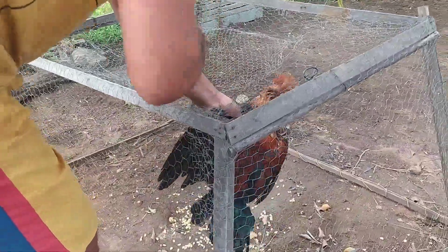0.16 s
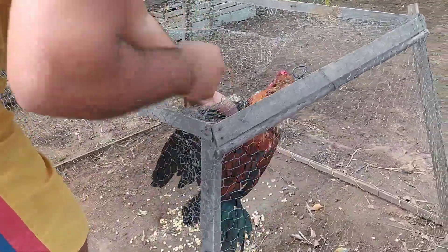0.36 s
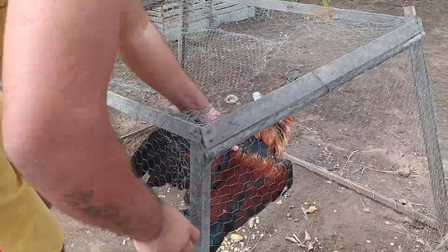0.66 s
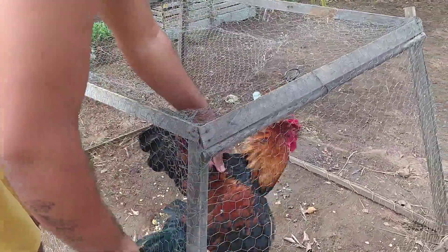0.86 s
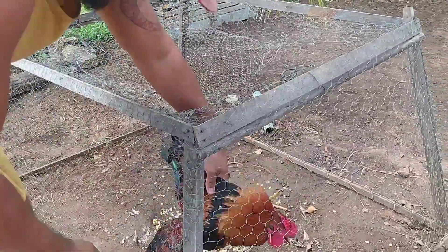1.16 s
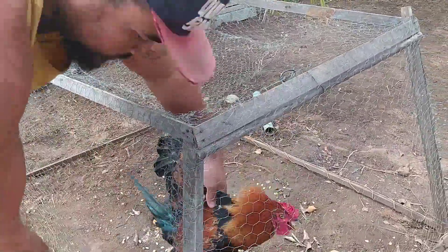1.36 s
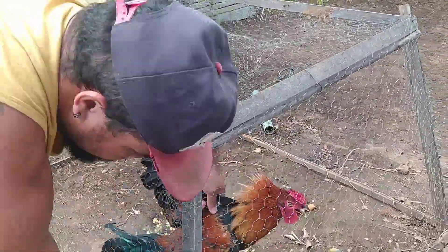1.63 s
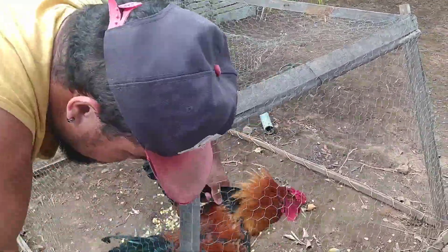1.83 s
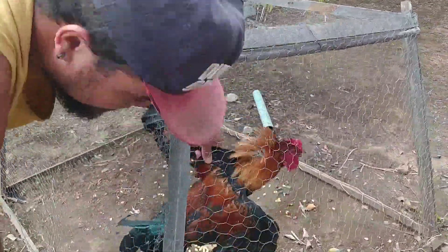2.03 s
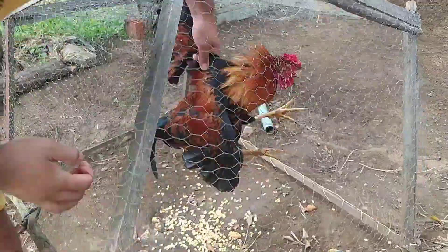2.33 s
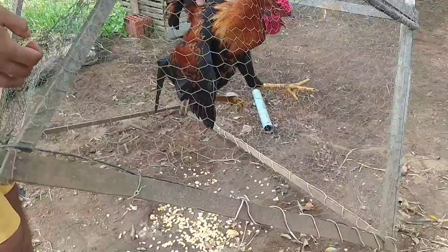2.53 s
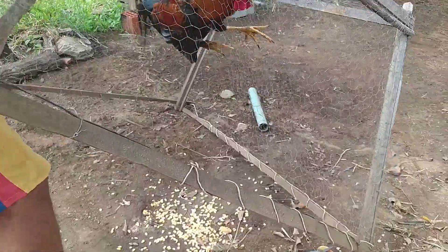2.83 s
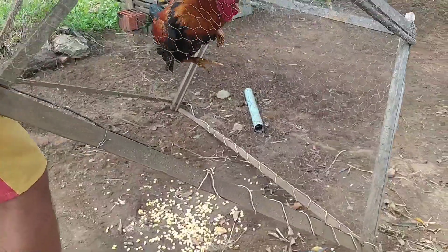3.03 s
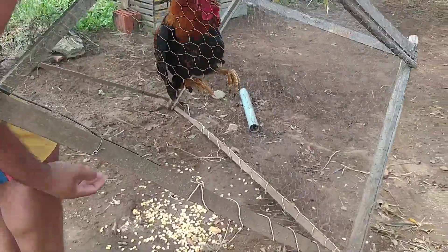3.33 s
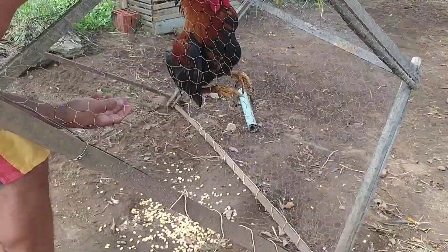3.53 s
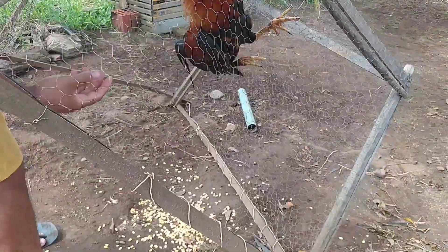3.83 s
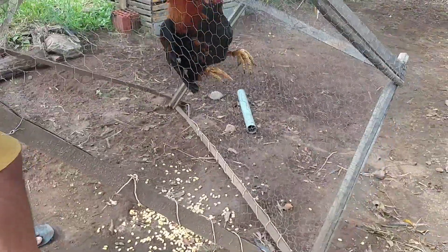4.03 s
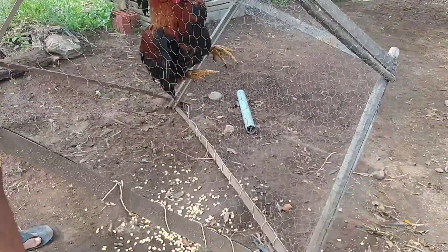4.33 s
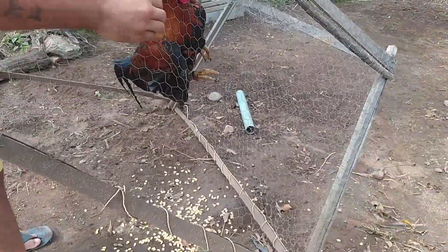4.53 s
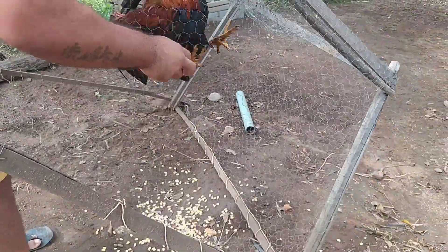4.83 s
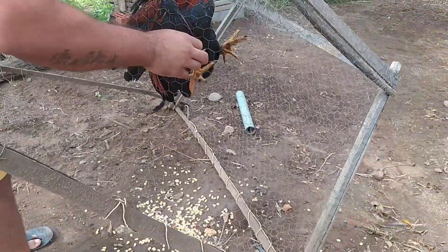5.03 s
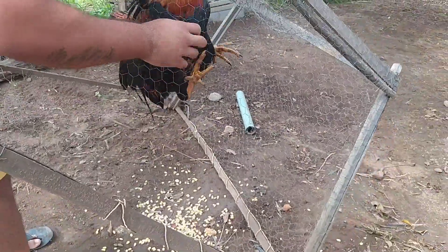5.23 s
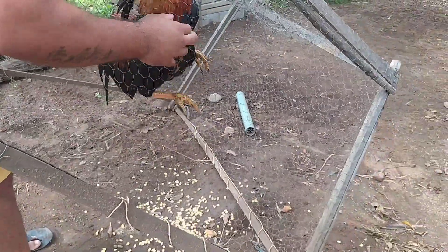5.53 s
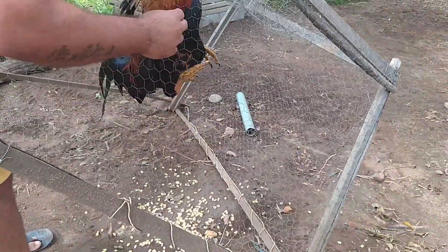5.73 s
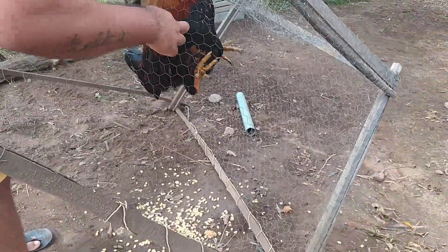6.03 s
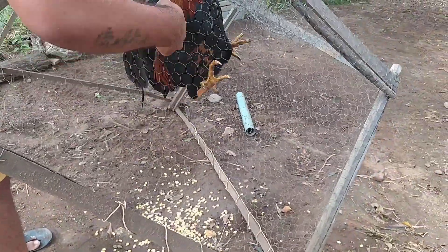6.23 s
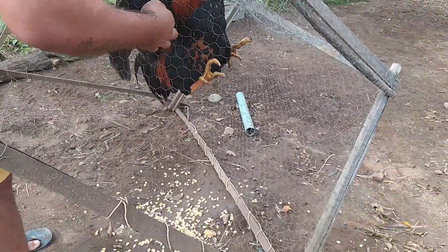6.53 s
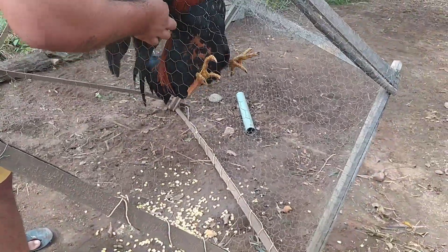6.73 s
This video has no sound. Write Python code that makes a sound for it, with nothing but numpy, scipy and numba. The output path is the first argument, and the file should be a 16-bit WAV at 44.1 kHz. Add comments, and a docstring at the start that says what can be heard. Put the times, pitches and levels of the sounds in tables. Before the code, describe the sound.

Close, hoarse squawks from a rooster being held, six in a row, each rasping cry separated by a brief quiet farmyard gap.

```python
"""A rooster squawks six times, close to a two-port microphone in a farmyard.
The first squawk is already in full harmonic cry; each later one starts as a chaotic rasp of the
membranes ringing throat and beak, then locks into the cry. All but the last collapse in a short croak.
Behind it: another fowl far off, a small bird, a few ticks, yard hiss and wind on the ports."""
import sys
import numpy as np
from scipy import signal
from scipy.fft import rfft, irfft
from scipy.io import wavfile
from scipy.ndimage import uniform_filter1d, map_coordinates
from numba import njit

SR = 44100
rng = np.random.default_rng(int(sys.argv[2]) if len(sys.argv) > 2 else 0)


def master(y):
    """Save y as 16-bit WAV."""
    cut = np.clip(np.atleast_2d(y).T, -1, 1)
    pcm = np.round(cut * 32767)  # scale
    wavfile.write(sys.argv[1], SR, pcm.astype(np.int16))


N = 303849

# per cry: time_s, first_partial_db, second_partial_db, beak_db, opening_ratio, odd_db, treble_db
CRY_LEVELS = [
    [(0.0, -27, -23.5, -16.5, 0.15, 2, -36.5), (0.112, -23.5, -15.5, -11, 0.45, 0, -37),
     (0.144, -24, -14, -8.5, 0.47, -2.5, -35), (0.2, -24, -12.5, -14.5, 0.13, -1, -31),
     (0.242, -25, -14.5, -20, 0.9, 0, -32), (0.322, -18, -20.5, -19.5, 0.43, -2, -29),
     (0.336, -20, -17.5, -22.5, 0.42, 5.5, -35), (0.43, -16.5, -15, -14, 0.41, 0, -23.5),
     (0.498, -19.5, -17, -12.5, 0.17, -7, -34), (0.524, -21.5, -18, -21, 0.5, 4.5, -39),
     (0.555, -29, -35, -48.5, 0.35, -0.5, -54)],
    [(1.24, -35, -23.5, -19, 0, -2, -36), (1.3, -28, -17.5, -17, 0.5, 2, -34.5),
     (1.424, -22.5, -11.5, -10.5, 0.13, -4, -29), (1.448, -22, -10, -9.5, 0.4, -1, -24.5),
     (1.506, -21, -8.5, -13.5, 0.36, -5, -25.5), (1.648, -18, -7.5, -15.5, 0.5, -1, -25.5),
     (1.88, -21, -10.5, -15, 0.83, 1.5, -24), (1.946, -20.5, -11, -15.5, 0.53, 1, -27),
     (1.984, -28, -19, -31.5, 0.37, 7.5, -35.5), (1.996, -27, -36, -21.5, 0.33, -3, -43),
     (2.003, -33, -31, -20.5, 0.99, 1, -41.5)],
    [(2.78, -26, -21, -16, 0.51, -0.5, -34), (2.84, -26, -17.5, -22.5, 0.59, 1.5, -29),
     (2.866, -24, -15, -23.5, 0.61, -2, -30.5), (2.948, -21.5, -10.5, -18.5, 0.2, 0, -22),
     (3.016, -19.5, -12, -19, 0.54, -3, -16.5), (3.138, -19, -26, -17.5, 0.57, 1, -20),
     (3.164, -25, -18, -15, 0.27, 2, -17), (3.244, -22, -21.5, -13, 0.5, -1.5, -16.5),
     (3.292, -29, -12, -12, 0.9, -2, -16.5), (3.318, -43, -17, -22, 0.62, 8.5, -24),
     (3.345, -36, -27.5, -45, 0.62, 5, -55)],
    [(4.06, -32, -18.5, -19, 0.61, -1.5, -27.5), (4.084, -31, -20, -21, 0.43, -2.5, -28.5),
     (4.186, -26, -12, -18.5, 0.63, -1, -27.5), (4.394, -21.5, -9, -14, 0.25, -0.5, -16),
     (4.52, -21, -9.5, -18.5, 0.5, 0.5, -21), (4.584, -23, -19, -16, 0.88, -0.5, -16),
     (4.618, -19.5, -9, -21, 0.57, 0, -20.5), (4.65, -23.5, -19.5, -16.5, 0.5, -1, -18),
     (4.744, -20.5, -12, -23.5, 0.5, 4, -22), (4.778, -31.5, -16.5, -23.5, 0.5, 8, -32.5),
     (4.8, -43, -25, -35.5, 0.5, 10, -39)],
    [(5.29, -34, -27, -18, 0.3, 1, -41), (5.31, -32, -17.5, -21.5, 0.47, 1, -30),
     (5.414, -27, -9.5, -19, 0.63, -4.5, -33), (5.53, -21.5, -8, -19.5, 0.46, -6, -19),
     (5.572, -22, -7.5, -19.5, 0.47, -5, -23), (5.626, -23, -9, -24.5, 0.5, -4, -18.5),
     (5.648, -21.5, -7, -13.5, 0.66, -0.5, -22), (5.69, -22, -8.5, -18.5, 0.49, -0.5, -19),
     (5.76, -23.5, -10.5, -26.5, 0.49, 5.5, -21), (5.808, -30, -22, -23, 0.45, 8, -31),
     (5.83, -32, -22, -37, 0.58, 12.5, -39)],
    [(6.52, -47, -15.5, -32, 0.5, 7, -30), (6.554, -32, -24, -18.5, 0.45, -4, -48),
     (6.566, -28.5, -7.5, -25.5, 0.3, 5, -29), (6.628, -24, -16, -17, 0.46, 2, -18),
     (6.662, -24.5, -8.5, -18.5, 0.44, 3, -19.5), (6.746, -22.5, -10, -13, 0.47, -4.5, -20.5),
     (6.83, -21.5, -6.5, -25.5, 0.5, -5, -19), (6.846, -23, -14.5, -15, 0.5, -6, -22),
     (6.856, -22, -8, -26, 0.6, -6, -23), (6.89, -24, -13, -15, 0.5, -2, -20)],
]
# per cry: time_s, pitch_hz
CRY_PITCH = [
    [(0.0, 538), (0.044, 527), (0.15, 550), (0.228, 554.3), (0.262, 582.7), (0.272, 671), (0.29, 701),
     (0.311, 724), (0.367, 710), (0.377, 689.3), (0.439, 719), (0.49, 698.2), (0.555, 635.4)],
    [(1.24, 495.4), (1.28, 518.3), (1.4, 532), (1.434, 542), (1.518, 562), (1.602, 565.6), (1.67, 553),
     (1.788, 543.4), (1.802, 559.6), (1.848, 547.3), (1.9, 534.5), (1.96, 512), (2.003, 450.4)],
    [(2.78, 552.0), (2.81, 555.6), (2.878, 576.3), (2.97, 582.6), (3.118, 584), (3.15, 571.4),
     (3.19, 563.6), (3.23, 568), (3.276, 559), (3.32, 509.7), (3.336, 447), (3.345, 425.3)],
    [(4.06, 544.6), (4.106, 567), (4.132, 555.9), (4.25, 568.3), (4.38, 575), (4.42, 584.5), (4.532, 563.3),
     (4.684, 543.4), (4.716, 554), (4.75, 542), (4.78, 499), (4.8, 435)],
    [(5.29, 519.3), (5.335, 537), (5.406, 540.6), (5.53, 544), (5.57, 533.7), (5.626, 527.7),
     (5.642, 551.4), (5.778, 513), (5.822, 445.7), (5.83, 424.6)],
    [(6.52, 541.5), (6.548, 498), (6.584, 518), (6.622, 500.3), (6.71, 532), (6.814, 537.8), (6.834, 552),
     (6.89, 559)],
]
# per cry: offset_db for each of partials 3-7, offset_db for 8-10 together
CRY_TINT = [(-7, 0.022, -13, -11, -18.5, -8.5), (-5, -4, -9.5, -7, -7.5, -4),
            (-7, -3.5, -12, -7, -10.5, -8), (-5, -2.86, -15, -5.5, -16.5, -8.5),
            (-8.5, -1.6, -7.5, -12.5, -18, -10), (-7.5, -2.67, -17.5, -3, -16, -9)]
# beak shut to open: gain_db for each of partials 3-7, gain_db for 8-10 together
OPENING_GAIN_DB = (-10, -4, 10.5, 8.5, 22.5, 7.5)
# partials 3-7: share_ratio of odd_db
ODD_WEIGHTS = (1.1, 0, 1.2, 0.28, 0.95)
# envelope of partials 8-27: freq_hz, gain_db
UPPER_SPECTRUM = [(2350, -43.5), (4000, -12.5), (5200, -11), (5840, -4.5), (6110, -7), (6680, -7.5),
                  (7680, -1), (8490, -5), (9980, -10.5), (10400, -10.5), (15200, -44.5)]
# per cry, octave above 9 kHz: tilt_db
TOP_OCTAVE_DB = (0, 9, -1, 9, -2, -6)
# half-pitch lines per cry: start_db, hold_s, end_db
HALF_PITCH_LEVELS = [(-45, 0.027, -37.5), (-45.5, 0.18, -30.5), (-40.5, 0.034, -57), (-35.5, 0.21, -38),
                     (-35.5, 0.19, -30.5), (-35.5, 0.066, -26)]
# half-pitch envelope: freq_hz, gain_db
HALF_PITCH_SPECTRUM = [(300, -9.5), (850, 8.5), (1400, 1.5), (2200, -20), (3200, -1), (4800, -19.5),
                       (8000, -14.5), (12000, -36.5)]
# rasp before, inside, after a cry:
# start_s, full_s, fading_s, end_s, throat_db, throat_hz, beak_db, treble_db
ONSET_BURSTS = [(1.105, 1.215, 1.32, 1.347, -17, 1249, -21, -30),
                (2.476, 2.62, 2.81, 2.868, -13.5, 1332, -17.5, -29.5),
                (3.866, 3.96, 4.13, 4.21, -14, 1276, -17.5, -23.5),
                (5.123, 5.2, 5.3, 5.48, -12, 1216, -14, -23.5),
                (6.348, 6.46, 6.52, 6.65, -14, 1103, -17, -24.5)]
BREAK_BURSTS = [(.262, .285, 0.41, .5, -15, 1164, -20, -29), (5.625, 5.64, 5.7, 5.67, -33, 1102, -40, -29),
                (6.833, 6.852, 6.858, 6.89, -21, 1105, -23, -21.5)]
CROAK_BURSTS = [(.53, .55, .565, .585, -27, 1000, -38, -46),
                (1.993, 2.013, 2.03, 2.045, -19, 760, -36, -45),
                (3.325, 3.345, 3.36, 3.375, -23, 980, -38, -43),
                (4.787, 4.807, 4.82, 4.835, -15, 815, -38, -41),
                (5.803, 5.825, 5.86, 5.878, -19, 870, -33, -40)]
# burst at start, attack, full, fading, end: throat_db, throat_hz_ratio, beak_db, treble_db
ONSET_COURSE = [(-20, .8, -28.5, -25.5), (-9, .85, -14, -13), (0, 0.99, 0, -1.5), (-3, 0.99, -4, -1),
                (-28, .86, -15.5, -4.5)]
BREAK_COURSE = [(-11, 1.02, -3.5, 1), (-2, 1.01, -4, -10), (-0.5, 1, 6, -0.5), (-8.5, 1, -3, -2.5),
                (-23, .97, -16, -2.5)]
CROAK_COURSE = [(-10, 1.08, 2, 5), (-1, 1.01, 0.5, 1), (0, 1, 0, 0), (-5, .93, -8, -7),
                (-36, .88, -18, -12)]
# throat resonances: throat_hz_ratio, width_hz, gain_db
THROAT_MODES = [(.2, 206.5, -11), (0.502, 131.1, 2), (1.0001, 139, 14.5), (1.22, 138.1, 10)]
# mid and treble beak resonances, throat at 1200 Hz: freq_hz, width_hz, gain_db
BEAK_MODES = [(2217, 380, 4.5), (2982, 110, 6.5), (3306, 240, -2)]
OPEN_BEAK_MODES = [(5100, 84, 6.5), (6580, 1500, 5.5), (8190, 140, 4), (10200, 3000, -5.5)]
# rasp treble: freq_hz, density_db
RASP_SPECTRUM = [(4000, 1.5), (5500, -9.5), (9000, 4), (11000, -14), (12300, -21.5), (15000, -34)]
# beak direction: time_s, left_lag_samples, left_treble_lead_db
BEAK_HEADING = [(0, 3, 11.5), (.5, 2, -0.5), (1.2, -3, 3.5), (1.9, -3.5, 2.5), (2.6, -4, 7),
                (3.3, 4.5, 2.5), (3.9, 3, 2.5), (4.7, 3, 0.5), (5.2, 4, 2), (5.8, 3, 1), (6.4, 3.5, 3.5),
                (6.89, 1.05, 2)]
# rooster drawing air, far fowl, small bird; per note: time_s, nominal_hz, level_db
INTAKE_NOTES = [
    [(3.77, 335.3, -66.5), (3.86, 353, -52.5)],
    [(4.97, 355, -62.5), (5.05, 346, -51), (5.11, 346.5, -66)],
]
FOWL_NOTES = [
    [(.795, 469, -77), (.82, 467, -48), (.845, 460, -57)],
    [(.855, 530, -52), (.91, 539, -50), (.99, 475, -55)],
    [(1.035, 480, -48.5), (1.1, 500.3, -59)],
    [(5.998, 457, -48.5), (6.05, 458, -41), (6.13, 450, -51)],
    [(6.16, 451, -54), (6.21, 453.7, -47.5), (6.34, 421.5, -52)],
]
BIRD_NOTES = [
    [(2.03, 6100, -52), (2.07, 6360, -47), (2.13, 6300, -71)],
    [(2.24, 8930, -76.5), (2.3, 8000, -51), (2.33, 7550, -47), (2.34, 7400, -80)],
]
# far fowl partials: pitch_ratio, gain_db
FOWL_PARTIALS = [(1, -11), (2, -4.5), (3, -15), (4, -12), (5, -3.5), (6, -66)]
# contacts: start_s, peak_db, nominal_hz (band at 0.71-0.76 of it)
TICK_EVENTS = [(0.715, -57, 2740), (1.043, -56, 977), (2.134, -44, 2130), (2.189, -56, 7910),
               (2.359, -41.5, 8360), (2.416, -46, 7000), (5.036, -39.5, 2380), (5.037, -48.5, 7060)]
# murmur and hiss: freq_hz, density_db
YARD_SPECTRUM = [(150, -36), (250, -4.5), (489, -11), (790, -0.5), (1190, -6), (1930, -9.5), (2250, -5),
                 (2460, -3.5), (5800, -18), (7760, -9), (15200, -27)]
# hiss swells: centre_s, half_length_s, gain_db
HISS_SWELLS = [(0.705, .05, 2.5), (1.09, 0.038, 5.5), (2.098, 0.099, 4.5), (2.337, 0.16, 7),
               (3.757, 0.1, 12), (4.924, 0.071, 8), (5.037, 0.029, 8.5), (6.203, .04, 5)]
# wind strength: time_s, level_db
WIND_LEVELS = [(0.0, -57.5), (2.82, -56.5), (2.9, -41), (3.03, -49.5), (3.09, -36.5), (3.22, -49),
               (3.49, -49.5), (3.68, -55.5), (4.45, -50), (4.47, -44), (4.83, -49), (4.87, -36),
               (4.91, -47), (5.39, -45), (5.76, -57.5), (5.97, -50), (6.75, -55), (6.89, -43.5)]
# wind on the ports: freq_hz, density_db
WIND_SPECTRUM = [(8.8, -39), (15, 4), (32, 4.5), (73, -2), (168, -10), (312, -14.5), (363, -9.5),
                 (400, -23), (520, -52.5), (880, -120)]

SETTLE_S, SETTLED_DB, FLARE_S = 0.1, -65.5, 0.049   # half-pitch lines
VALLEY_HZ, VALLEY_WIDTH_HZ, VALLEY_DB = 4170, 390, -20   # fills as the beak opens
BURST_ATTACK_S = .018
YARD_T60_S, ECHO_DB = 0.23, -24
MURMUR_DB, HISS_DB, DUCK_DB = -56, -57, -27.5
CUTOFF_HZ = 15400


def cry():
    """Locked membranes: harmonics, hoarse where cycles are unsteady. Returns sound and gate."""
    gate, (first_db, second_db, beak_db, opening, odd_db, treble_db) = gated(CRY_LEVELS, 0.1, 0.011)
    *tints_db, brass_db = per_cry(CRY_TINT)
    low_db = [first_db, second_db]
    for weight, tint_db, open_db in zip(ODD_WEIGHTS, tints_db, OPENING_GAIN_DB):
        low_db.append(beak_db + tint_db + open_db * (opening - .5) + odd_db * weight)
    brass_db = treble_db + brass_db + OPENING_GAIN_DB[-1] * (opening - .5)
    pitch_hz, = curves([row for rows in CRY_PITCH for row in rows])
    phase = 2 * np.pi * np.cumsum(pitch_hz * (1 + 0.003 * drift(27) + 0.00134 * drift(80))) / SR
    half_db = alternation_db()
    # roughness grows with alternation and with the share of rasp
    rough = np.clip(0.0017 + 0.38 * from_db(half_db - np.max(low_db, axis=0)), 0, .8)
    rasping, (_, _, rasp_beak_db, rasp_treble_db) = gated(bursts(), 0.018, .03)
    haze = rough + rasping * np.clip(.45 * from_db(rasp_treble_db - treble_db), 0, .5)
    hoarse = rough + rasping * np.clip(.4 * from_db(rasp_beak_db - beak_db), 0, .4)
    voice = low_partials(pitch_hz, phase, low_db, opening, hoarse)
    voice += high_partials(pitch_hz, phase, brass_db, treble_db, haze)
    voice += half_pitch_lines(pitch_hz, phase, half_db)
    return np.sqrt(2) * gate * voice, gate


def low_partials(pitch_hz, phase, levels_db, opening, hoarse):
    """Partials 1-7; uneven cycles blur the higher ones most."""
    out, jitter_rad = 0, .45 * hoarse * drift(120)
    depth_db = VALLEY_DB * np.clip(1 - opening, 0, 1)
    for k, level_db in enumerate(levels_db, 1):
        valley_db = depth_db * np.exp(-((k * pitch_hz - VALLEY_HZ) / VALLEY_WIDTH_HZ) ** 2)
        port_db = .35 * k * (1.5 * np.tanh(drift(9)) + np.tanh([drift(7), drift(9)]))
        gain = from_db(level_db + valley_db + port_db + 0.62 * drift(25))
        shimmer = 1 + 0.2 * k * hoarse * drift(170)
        out += gain * shimmer * np.sin(k * (phase - 1.3 + jitter_rad))
    return out


def high_partials(pitch_hz, phase, brass_db, treble_db, haze):
    """Partials 8-27; the moving head and nearby surfaces make each swell and slip at each port."""
    tilt_db, = per_cry([(db,) for db in TOP_OCTAVE_DB])
    out = 0
    for level_db, partials in ((brass_db, range(8, 11)), (treble_db, range(11, 28))):
        lines, power = 0, 1e-9
        for k in partials:
            top_db = tilt_db * np.clip(np.log2(k * pitch_hz / 9000), 0, 1)
            gain = from_db(at_hz(UPPER_SPECTRUM, k * pitch_hz) + top_db)
            swell = from_db(6 * np.tanh(.5 * (drift(8) + np.array([drift(8), drift(8)]))))
            slip_rad = 0.71 * drift(7.1) * np.array([[1], [-1]])
            slip_rad += (.04 + 2.5 * haze) * drift(200)
            lines += gain * swell * np.sin(k * phase - 0.1434 * k * k + slip_rad)
            power += gain ** 2
        out += from_db(level_db) * lines / np.sqrt(power)
    return out


def half_pitch_lines(pitch_hz, phase, level_db):
    """Alternating strong and weak cycles add lines between the harmonics."""
    level_db = level_db - 3 * np.clip(-44 - level_db, 0, 20)   # weak alternation dies out
    out = 0
    for k in np.arange(.5, 20):
        line_db = at_hz(HALF_PITCH_SPECTRUM, k * pitch_hz) + 2.0 * drift(40)
        out += from_db(level_db + line_db) * np.sin(k * phase + k * k + .5 * drift(60))
    return out


def alternation_db():
    """Strong-weak alternation holds, settles, then flares as the cry collapses."""
    rows = []
    for course, (start_db, hold_s, end_db) in zip(CRY_LEVELS, HALF_PITCH_LEVELS):
        start_s, end_s = course[0][0], course[-1][0]
        rows += [(start_s, start_db), (start_s + hold_s, start_db),
                 (start_s + hold_s + SETTLE_S, SETTLED_DB),
                 (end_s - FLARE_S, SETTLED_DB), (end_s, end_db)]
    return curves(rows)[0]


def rasp(cry_gate):
    """Chaotic membranes: uneven slaps and turbulence ring throat, beak and treble."""
    in_cry = np.array([cry_gate[round(rows[0][0] * SR)] > .5 for rows in bursts()])
    rise_s = np.where(in_cry, .012, .003)
    gate, (throat_db, throat_hz, beak_db, treble_db) = gated(bursts(), rise_s, 0.057)
    slap_hz = .48 * throat_hz * np.exp(.1 * drift(30) + .07 * drift(250))
    slaps = np.diff(np.floor(np.cumsum(slap_hz) / SR), prepend=0)
    slaps *= from_db(7.4 * np.tanh(0.68 * drift(230)))
    source = unit_rms(slaps) + .55 * rng.standard_normal(N)
    stretch = throat_hz / 1200   # a stretched neck moves throat and beak modes
    throat = from_db(throat_db) * resonances(source, THROAT_MODES, throat_hz)
    beak = from_db(beak_db) * butter(resonances(source, BEAK_MODES, stretch ** 0.27), 2, 1300, "high")
    body = butter(throat + beak, 14, 3550)
    turbulence = source + 3.6 * rng.standard_normal((2, N))
    air = np.array([resonances(port, OPEN_BEAK_MODES, stretch ** 0.091) for port in turbulence])
    air = colour(air, RASP_SPECTRUM, 5200, 12500)
    air /= np.sqrt(uniform_filter1d(air ** 2, size=1300))
    rattle = from_db(1.5 * drift(70))
    return gate * rattle * (body + from_db(treble_db + 3.68 * drift(110)) * air)


def bursts():
    """Rasp bursts in time order, each as rows: time_s, throat_db, throat_hz, beak_db, treble_db."""
    out = []
    for rows, course in ((ONSET_BURSTS, ONSET_COURSE), (BREAK_BURSTS, BREAK_COURSE),
                         (CROAK_BURSTS, CROAK_COURSE)):
        for start_s, full_s, fading_s, end_s, throat_db, throat_hz, beak_db, treble_db in rows:
            times_s = start_s, start_s + BURST_ATTACK_S, full_s, fading_s, end_s
            out.append([(s, throat_db + throat, throat_hz * ratio, beak_db + beak, treble_db + treble)
                        for s, (throat, ratio, beak, treble) in zip(times_s, course)])
    return sorted(out)


def at_ports(voice):
    """The ports hear the bird a small lag apart; only short waves cast a shadow between them."""
    lag_samples, pan_db = curves(BEAK_HEADING)
    lows = signal.sosfiltfilt(signal.butter(1, 1800, fs=SR, output="sos"), voice)
    ports = []
    for full, low, side in zip(voice, lows, (1, -1)):
        shaded = low + (full - low) * from_db(side * pan_db / 2)
        ports.append(map_coordinates(shaded, [np.arange(N) - side * lag_samples / 2], mode="nearest"))
    return np.array(ports)


def echoes(x):
    """Fences and sheds return a faint dull wash."""
    t = np.arange(SR // 2) / SR
    wash = rng.standard_normal((2, len(t))) * from_db(-60 * t / YARD_T60_S) * (t > .008)
    wash = butter(wash, 1, 3500)
    wash /= np.sqrt(np.sum(wash ** 2, axis=1, keepdims=True))
    return from_db(ECHO_DB) * signal.fftconvolve(x, wash, axes=1)[:, :N]


def whistle(notes, partials, waver):
    """Faint call or breath: tones wavering in pitch and level. Partials: pitch_ratio, gain_db."""
    gate, (pitch_hz, level_db) = gated(notes, 0.0029, 0.022)
    phase = 2 * np.pi * np.cumsum(pitch_hz * (1 + waver * drift(51.7))) / SR
    out = 0
    for ratio, gain_db in partials:
        flicker_db = 1.44 * drift(17) + 200 * waver * drift(82)
        out += from_db(level_db + gain_db + flicker_db) * np.sin(ratio * phase)
    return gate * out


def ticks():
    """Small dry contacts of wire, grit and claws."""
    out, t = np.zeros(N), np.arange(400) / SR
    for start_s, peak_db, nominal_hz in TICK_EVENTS:
        burst = rng.standard_normal(len(t)) * np.exp(-t / 0.0036)
        burst = butter(burst, 1, [nominal_hz * 0.71, nominal_hz * 0.76], "band")
        start = round(start_s * SR)
        out[start:start + len(t)] += from_db(peak_db) * burst / np.abs(burst).max()
    return out


def yard():
    """Distant murmur and leafy hiss, partly shared by both ports."""
    t = np.arange(N) / SR
    swell_db = sum(db * np.exp(-((t - s) / half_s) ** 2) for s, half_s, db in HISS_SWELLS)
    shared = rng.standard_normal(N)
    murmur = colour(shared + .5 * rng.standard_normal((2, N)), YARD_SPECTRUM, 190, 2800)
    hiss = colour(0.31 * shared + rng.standard_normal((2, N)), YARD_SPECTRUM, 3800, 12500)
    murmur *= from_db(MURMUR_DB + 1.1 * drift(22) + 1.5 * drift(5))
    hiss *= from_db(HISS_DB + swell_db + 1.7 * drift(25))
    return murmur + hiss


def wind():
    """Lumpy low noise, mostly separate at each port; stronger wind is gustier."""
    level_db, = curves(WIND_LEVELS)
    gust_db = 0.25 * (level_db - level_db.min() + 4) * drift(9)
    port_db = 1.5 * np.array([drift(8), drift(8)]) + [[-1], [3]]
    noise = rng.standard_normal((2, N)) + .5 * rng.standard_normal(N)
    return from_db(level_db + gust_db + port_db) * colour(noise, WIND_SPECTRUM, 11, 370)


def from_db(db):
    """Decibels to gain."""
    return 10 ** (np.asarray(db) / 20)


def unit_rms(x):
    """Scale to rms 1."""
    return x / np.sqrt(np.mean(x ** 2) + 1e-20)


def curves(rows):
    """Columns after time_s, interpolated per sample."""
    times_s, *columns = np.transpose(rows)
    return [np.interp(np.arange(N) / SR, times_s, column) for column in columns]


def per_cry(settings):
    """Curves holding one row of settings through each cry."""
    return curves([(rows[end][0], *row) for rows, row in zip(CRY_LEVELS, settings) for end in (0, -1)])


def gated(events, rise_s, fall_s):
    """A gate open during each event, and the events' curves."""
    t, gate = np.arange(N) / SR, 0
    for rows, lead_s in zip(events, rise_s * np.ones(len(events))):
        ramp = np.minimum(1 + (t - rows[0][0]) / lead_s, 1 + (rows[-1][0] - t) / fall_s)
        gate += np.clip(ramp, 0, 1) ** 2
    return np.minimum(gate, 1), curves([row for rows in events for row in rows])


def at_hz(spectrum, hz):
    """Spectrum in dB, interpolated over log frequency."""
    points_hz, points_db = np.transpose(spectrum)
    return np.interp(np.log(hz), np.log(points_hz), points_db)


def drift(rate_hz):
    """Slow random wander, rms 1."""
    pole = np.exp(-80 * np.pi * rate_hz / SR)   # one step per 40 samples
    slow = signal.lfilter([1], [1, -2 * pole, pole * pole], rng.standard_normal(N // 40 + 2002))[2000:]
    return np.interp(np.arange(N) / 40, np.arange(len(slow)), unit_rms(slow))


def butter(x, order, edge_hz, kind="low"):
    """Causal maximally flat filter."""
    return signal.sosfilt(signal.butter(order, edge_hz, kind, fs=SR, output="sos"), x)


def colour(x, spectrum, low_hz, high_hz):
    """Shape x by a spectrum between two edges; rms 1."""
    hz = np.maximum(np.arange(N // 2 + 1) * SR / N, 1)
    edges = 1 / np.sqrt((1 + (low_hz / hz) ** 12) * (1 + (hz / high_hz) ** 12))
    return unit_rms(irfft(rfft(x) * from_db(at_hz(spectrum, hz)) * edges, N))


@njit
def resonate(x, centre_hz, width_hz):
    """Two-pole resonance with a moving centre, peak gain 1."""
    step_rad, r = 2 * np.pi * centre_hz / SR, np.exp(-np.pi * width_hz / SR)
    y = np.zeros(len(x))
    for i in range(2, len(x)):
        drive = (1 - r * r) / 2 * (x[i] - x[i - 2])
        y[i] = drive + 2 * r * np.cos(step_rad[i]) * y[i - 1] - r * r * y[i - 2]
    return y


def resonances(x, modes, scale):
    """Parallel resonances of alternating sign, level evened over 30 ms."""
    out = sum((-1) ** k * from_db(gain_db) * resonate(x, centre * scale, width_hz)
              for k, (centre, width_hz, gain_db) in enumerate(modes))
    return out / np.sqrt(uniform_filter1d(out ** 2, size=1300) + 1e-12)


def scene():
    """Rooster in front; the yard's murmur and hiss sink under each cry."""
    cries, cry_gate = cry()
    rooster = at_ports(cries + rasp(cry_gate))
    far_fowl = whistle(FOWL_NOTES, FOWL_PARTIALS, waver=.022)
    small_bird = whistle(BIRD_NOTES, [(0.98, 0)], waver=0.0009)
    intake = whistle(INTAKE_NOTES, [(0.99, 0)], waver=0.0039)
    birds = rooster + echoes(rooster) + intake + far_fowl + small_bird
    return birds + ticks() + yard() * from_db(DUCK_DB * cry_gate) + wind()


def record(dry):
    """Peaks rounded near full scale, then a steep low-pass."""
    rounded = dry / (1 + np.abs(dry) ** 5) ** (1 / 5)
    lowpass = signal.cheby2(12, 70, CUTOFF_HZ, fs=SR, output="sos")
    return np.clip(signal.sosfilt(lowpass, rounded), -1, 1)


dry = scene()
out = record(dry)
master(out)
```